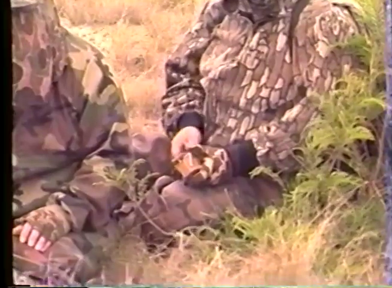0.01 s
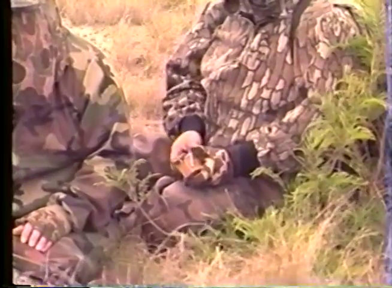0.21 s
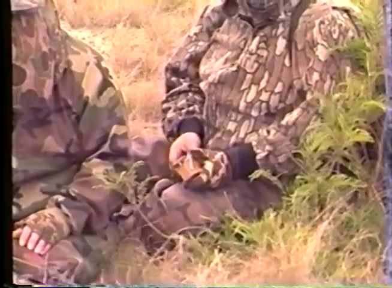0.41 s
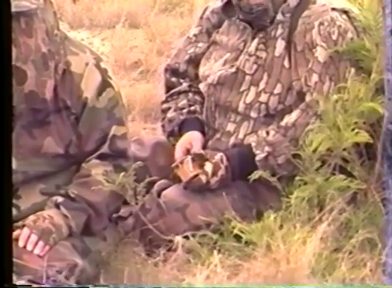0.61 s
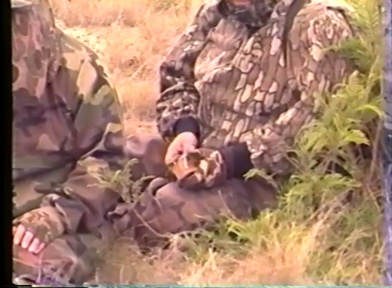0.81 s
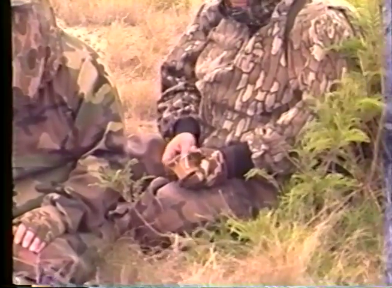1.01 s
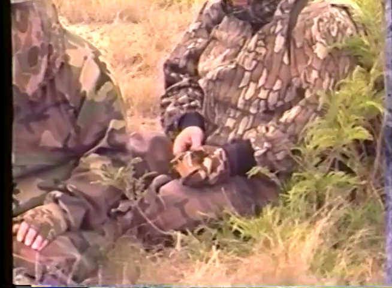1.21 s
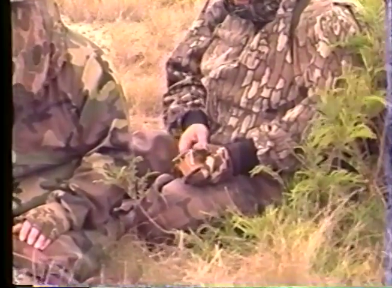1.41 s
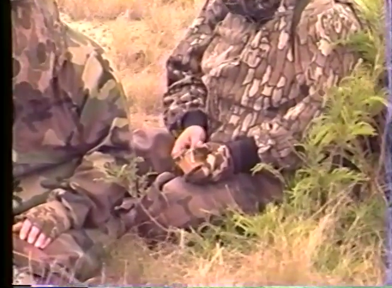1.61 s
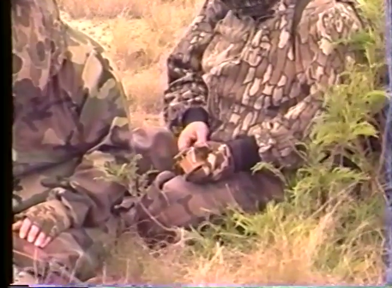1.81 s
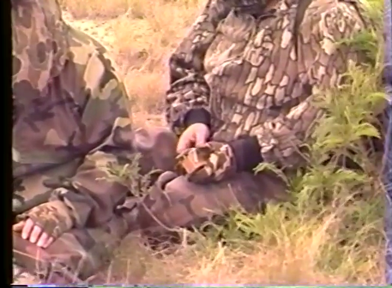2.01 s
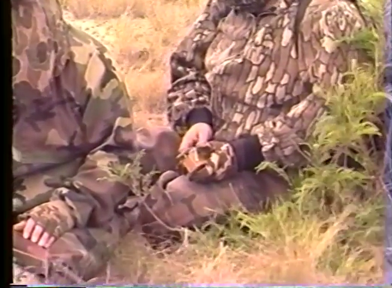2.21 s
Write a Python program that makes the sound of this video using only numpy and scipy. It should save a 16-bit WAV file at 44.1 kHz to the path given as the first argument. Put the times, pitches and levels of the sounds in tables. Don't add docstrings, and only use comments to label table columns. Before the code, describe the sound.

A wooden box call yelps six times, close and dry, outdoors. Faint grass hiss, low hum and wind rumble lead to a soft tap at 0.2 s and a gentle yelp. Stronger scratchy yelps follow at about 0.54, 0.81, 1.08, 1.37 and 1.62 s, each dropping into woody chatter. Light return scrapes and clicks fall between; a dull knock comes near 2 s, then background hiss and wind swell back.

```python
import sys
import numpy as np
from scipy import signal
from scipy.fft import rfft, irfft
from scipy.io import wavfile
from scipy.ndimage import uniform_filter1d

SR = 44100
rng = np.random.default_rng(int(sys.argv[2]) if len(sys.argv) > 2 else 0)


def store_pcm(level_fs):
    pcm = np.round(np.clip(level_fs, -1, 1) * 32767).astype(np.int16)
    wavfile.write(sys.argv[1], SR, np.atleast_2d(pcm).T)


def magnitude_from_level(level_db):
    exponent = np.asarray(level_db, float) / 20
    return 10 ** exponent


N = 101430

# f/Hz, level/dB per Hz
AIR_SPECTRUM = [(150, -2), (250, -11.5), (651, -6.5), (1040, -12), (1280, -16), (2360, -17), (3280, -20.5),
                (5070, -18), (16000, -23.5)]
# t/s, level/dB
BREEZE = [(0, -6), (.15, 2.5), (1.0, -4), (1.9, -2), (2.12, 2), (2.3, -3)]
# f/Hz, width/Hz, level/dB
INSECTS = [(5130, 200, -71), (2166, 90, -71.5)]
# f/Hz, level/dB per Hz
WIND_SPECTRUM = [(8.8, -34), (15, -4), (43, -5.5), (59, -1.5), (124, -10.5), (168, -14.5), (288, -17),
                 (400, -24), (520, -38), (880, -120)]
# t/s, level/dB
GUSTS = [(0, -49.5), (.5, -54), (1.8, -55), (2.02, -43.5), (2.15, -41), (2.22, -48), (2.3, -38.5)]
# f/Hz, level/dB
HUM = [(59.9, -53), (90, -59), (150, -64), (240, -68)]
# f/Hz, level/dB per Hz
SIDE_SPECTRUM = [(12, -24), (20, 10), (571, -36), (940, -32), (1080, -39), (1680, -53), (15000, -76)]
# f/Hz, level/dB
WHINE = (15730, -65.5)
TAP_TIMES = [.18, .515, 1.462, 1.722, 1.981]
# peak level/dB, low-pass f/Hz, lowest mode level/dB
TAPS = [
    (-28, 620, 2),
    (-25.5, 900, 3),
    (-44, 1100, 3),
    (-28.5, 14000, 2),
    (-22.5, 1300, -11.5),
]
# f/Hz, width/Hz, level/dB
TAP_MODES = [(843, 61, 2), (1500, 111, -4), (2160, 830, -16), (3300, 3500, -23), (6070, 1300, -33.5)]
# t/s, level/dB, twice the slip rate f/Hz
EARLY_YELPS = [
    [(0.229, -20.5, 1633), (0.241, -20, 1790), (0.277, -23, 1655), (0.289, -18.5, 1548), (0.305, -21, 1381),
     (0.345, -29.5, 1300), (0.365, -43.5, 1286)],
    [(0.54, -6, 1574), (0.546, -20.5, 1586), (0.56, -21.5, 1709), (0.576, -18.5, 1571), (0.59, -20.5, 1422),
     (0.608, -20, 1305), (0.626, -28, 1270)],
    [(0.81, -22, 1673), (0.818, -21.5, 1707), (0.826, -19, 1607), (0.844, -21.5, 1657),
     (0.854, -17.5, 1569), (0.886, -20.5, 1284), (0.899, -25, 1270)],
]
LATE_YELPS = [
    [(1.086, -13.5, 1589), (1.1, -20.5, 1691), (1.114, -20.5, 1638), (1.128, -18, 1533), (1.148, -20, 1300),
     (1.158, -27.5, 1300)],
    [(1.366, -13.5, 1710), (1.374, -19, 1608), (1.388, -18, 1574), (1.41, -19.5, 1278), (1.42, -28, 1283)],
    [(1.624, -15.5, 1546), (1.634, -19, 1675), (1.648, -18, 1584), (1.678, -20, 1299), (1.69, -26.5, 1265)],
]
# f/Hz, width/Hz, level/dB
BOX_MODES = [(1776, 61, 1), (935.3, 54, -6.5), (1377, 255, 0), (1579.7, 148, 0.5), (2080, 128, -7),
             (2315, 470, -15), (3523, 900, -19), (4070, 320, -10), (4760, 750, -29), (5717, 1060, -24),
             (6317, 450, -20), (7270, 380, -24), (8330, 560, -28.5), (10550, 1500, -36)]
BOX_SIGNS = [-1, 1, 1, -1, 1, -1, -1, 1, 1, 1, -1, -1, -1, 1]
# f/Hz, level/dB
LOWEST_PARTIAL = [(640, -2), (740, -4.5), (785, -12.5), (815, 1), (880, -3.5)]
# t/s, length/s, level/dB, low mode f/Hz, brightness/dB
TAILS = [
    (0.338, 0.021, -43.5, 912, -7),
    (0.621, 0.022, -28.5, 878, -1.5),
    (0.899, 0.023, -28.5, 876, -1.5),
    (1.157, 0.016, -28, 882, -0.5),
    (1.416, 0.025, -27, 914, -3),
    (1.688, 0.025, -26, 868.5, -0.5),
    (1.763, .007, -46.5, 825, -20),
]
# f/Hz, width/Hz, level/dB
TAIL_MODES = [(1330, 270, -9.5), (1620, 300, -19.5), (2098, 50, -7), (2490, 130, -16), (3880, 410, -17),
              (5770, 280, -19.5), (7140, 400, -30.5), (8700, 310, -26.5)]
SCRAPE_TIMES = [.712, 1.01, 1.258, 1.804, 1.983]
# length/s, level/dB, fade/dB
SCRAPES = [
    (0.026, -45, -12),
    (.05, -58.5, -1),
    (0.066, -34, -13),
    (0.044, -38, -11),
    (0.02, -44, -0.5),
]
# f/Hz, width/Hz, level/dB
LID_MODES = [(945, 42, -9.5), (1273, 141, -1.5), (1406, 136, 3), (1508, 124, -3.5), (1880, 200, -19.5),
             (2640, 630, -20), (4040, 330, -16.5), (5590, 130, -11.5), (6180, 120, -13), (7350, 310, -21.5),
             (8420, 490, -18), (9050, 270, -18.5), (11400, 1200, -32.5)]
CHATTER_TIMES = [.81, 1.075, 1.366, 1.623]
# length/s, level/dB, slip rate f/Hz
CHATTERS = [
    (0.009, -26, 790),
    (0.012, -29, 1700),
    (0.0063, -25, 900),
    (0.0054, -25.5, 900),
]
# t/s, length/s, level/dB, start f/Hz, end f/Hz
BIRD = [
    (1.034, .024, -55, 3200, 4400),
]

AIR_DB, SIDE_DB, SIDE_LEAK_DB, PAN_DB = -50, -62.5, -43, 0.64
WOBBLE, WOBBLE_S, SHIMMER, GRIT_DB = 0.007, 0.00093, 0.08, -21
UNSTABLE_HZ, UNSTABLE_SPAN_HZ, UNSTABLE_DB = 790, 70, 9
WANDER_DB, WANDER_S, DULL_PER_DB = 3.5, 0.0046, 0.09
RISE_S, RELEASE_S = 0.0063, 0.0017
LOW_WIDTH_HZ, TAIL_FADE_DB, TAIL_SLIP_S, TAIL_GRIT = 58, -8, 0.00006, 0.1
GRAINS_PER_S, GRAIN_SPREAD_DB, LUMPS_DB = 7000, 3.0, 3.0
CHATTER_JITTER = 0.35
DUCK_FROM_DB, DUCK_SHARE, MOST_DUCK_DB = -50, 0.82, 14.5
RECOVER_DB_PER_S, WIND_DUCK = 170, 0.22
THUMP_DB, TAPE_HISS_DB = -27, -38.5
CEILING = 0.44


def evened(x):
    return x / np.sqrt(np.mean(x ** 2) + 1e-20)


def add(mix, s, sound):
    part = mix[round(s * SR):][:len(sound)]
    part += sound[:len(part)]


def ring(force, modes, signs=None):
    t = np.arange(4096) / SR
    signs = signs or [(-1) ** k for k in range(len(modes))]
    response = 0
    for sign, (hz, width, db) in zip(signs, modes):
        decay = np.exp(-np.pi * width * t)
        response = response + sign * magnitude_from_level(db) * width * decay * np.sin(2 * np.pi * hz * t)
    return signal.oaconvolve(force, response / SR * 2 * np.pi)


def coloured(points):
    hz = np.fft.rfftfreq(N, 1 / SR)
    f, level = np.transpose(points)
    gain = magnitude_from_level(np.interp(np.log(hz + 1), np.log(f + 1), level, left=-100, right=-100))
    return evened(irfft(rfft(rng.standard_normal(N)) * gain, N))


def drift(size, span_s):
    span = max(round(span_s * SR), 2)
    smooth = uniform_filter1d(rng.standard_normal(size), span)
    return evened(uniform_filter1d(smooth, span))


def driven(force, level_db, modes, signs=None):
    heard = ring(force, modes, signs)[:len(force)]
    power = uniform_filter1d(heard ** 2, round(0.0044 * SR), mode="mirror")
    power = np.maximum(power, 0.2 * power.mean())
    return ring(force * magnitude_from_level(level_db) / np.sqrt(power), modes, signs)


def air():
    drones = 0
    for hz, width, db in INSECTS:
        band = [(hz, width, 0)]
        drone = ring(ring(rng.standard_normal(N), band), band)[:N]
        drones = drones + magnitude_from_level(db) * evened(drone)
    breeze_db = np.interp(np.arange(N) / SR, *np.transpose(BREEZE))
    return magnitude_from_level(AIR_DB + breeze_db + drift(N, 0.02)) * coloured(AIR_SPECTRUM) + drones


def wind():
    gust_db = np.interp(np.arange(N) / SR, *np.transpose(GUSTS))
    return coloured(WIND_SPECTRUM) * magnitude_from_level(gust_db - 1.0 + 1.26 * drift(N, 0.031))


def mains_hum():
    t = np.arange(N) / SR
    return sum(magnitude_from_level(db) * np.sin(2 * np.pi * (hz * t + rng.random())) for hz, db in HUM)


def tap(s, peak_db, soft_hz, low_db):
    t = np.arange(200) / SR
    push = np.exp(-2 * np.pi * soft_hz * t)
    push = push - 0.5 * np.roll(push, 110)
    lowest_mode = (*TAP_MODES[0][:2], low_db)
    out = ring(push, [lowest_mode] + TAP_MODES[1:])
    return s, magnitude_from_level(peak_db) * out / abs(out).max()


def yelp(rows):
    s, level, double_hz = np.transpose(rows)
    t = np.arange(s[0], s[-1], 1 / SR)
    size = len(t)
    hz = uniform_filter1d(np.interp(t, s, double_hz), 150) / 2
    shaky = magnitude_from_level(UNSTABLE_DB * np.clip((hz - UNSTABLE_HZ) / UNSTABLE_SPAN_HZ, 0, 1))
    turns = np.cumsum(hz * (1 + shaky * WOBBLE * drift(size, WOBBLE_S))) / SR
    edge = np.clip(np.minimum((t - s[0]) / RISE_S, (s[-1] - t) / RELEASE_S), 0, 1)
    level_db = np.interp(t, s, level) + 20 * np.log10(edge + 1e-4)
    dull_db = DULL_PER_DB * np.clip(level_db + 15.5, -40, 0)

    slips = magnitude_from_level(np.interp(hz, *np.transpose(LOWEST_PARTIAL))) * np.cos(2 * np.pi * turns)
    slips += np.cos(2 * np.pi * 2 * turns)
    for k in range(3, 19):
        partial_db = k * dull_db + WANDER_DB * drift(size, WANDER_S)
        slips += magnitude_from_level(partial_db) * np.cos(2 * np.pi * k * turns)
    burst = 0.64 + np.exp(-(turns % 1) / 0.9)
    grit = evened(burst * rng.standard_normal(size) * magnitude_from_level(3.0 * drift(size, 0.009)))
    force = slips * (1 + SHIMMER * drift(size, 0.0018))
    force += 3 * magnitude_from_level(GRIT_DB + 12 * dull_db) * shaky * grit
    return s[0], driven(force, level_db, BOX_MODES, BOX_SIGNS)


def tail(start, length, level_db, mode_hz, bright_db):
    draw = rng.random((40, 3))
    swings = np.cumsum(1 + (draw[:, 0] * 3).astype(int)) - 1
    at = (swings + 0.5 * draw[:, 1]) / mode_hz
    keep = at < length
    u = np.arange(round(length * SR) + 2) / (length * SR)
    force = TAIL_GRIT * rng.standard_normal(len(u))
    force[(at[keep] * SR).astype(int)] = 0.5 + draw[keep, 2]
    force = signal.lfilter([1], [1, -np.exp(-1 / (TAIL_SLIP_S * SR))], force)
    modes = [(mode_hz, LOW_WIDTH_HZ, -bright_db)] + TAIL_MODES
    return start, driven(force, level_db + TAIL_FADE_DB * u ** 2, modes)


def scrape(start, length, level_db, fade_db):
    t = np.arange(0, length, 1 / SR)
    grains = (rng.random(len(t)) < GRAINS_PER_S / SR) * rng.choice([-1, 1], len(t))
    grains = grains * magnitude_from_level(GRAIN_SPREAD_DB * np.minimum(rng.exponential(1, len(t)), 4))
    shape = magnitude_from_level(LUMPS_DB * drift(len(t), 0.0022) + fade_db * (t / length) ** 2)
    scale = np.sqrt(np.mean(ring(grains, LID_MODES)[:len(t)] ** 2))
    return start, magnitude_from_level(level_db) * ring(grains * shape / scale, LID_MODES)


def chatter(start, length, level_db, rate):
    draw = rng.standard_normal((40, 2))
    at = np.cumsum(np.exp(CHATTER_JITTER * draw[:, 0]) / rate) - 1 / rate
    keep = (at < length) & (at >= 0)
    force = 0.12 * rng.standard_normal(round(length * SR) + 2)
    force[(at[keep] * SR).astype(int)] = magnitude_from_level(1.7 * draw[keep, 1])
    out = ring(signal.lfilter([1], [1, -0.7], force), BOX_MODES, BOX_SIGNS)
    return start, magnitude_from_level(level_db) * out / np.sqrt(np.mean(out[:len(force)] ** 2))


def bird(start, length, level_db, from_hz, to_hz):
    u = np.arange(0, 1, 1 / (length * SR))
    hz = from_hz + (to_hz - from_hz) * u
    return start, magnitude_from_level(level_db) * np.sin(np.pi * u) * np.sin(2 * np.pi * np.cumsum(hz) / SR)


def ducking(power):
    fall = np.arange(N) * RECOVER_DB_PER_S / SR
    held_db = np.maximum.accumulate(10 * np.log10(power) + fall) - fall
    over_db = uniform_filter1d(np.maximum(held_db - DUCK_FROM_DB, 0), 900)
    return np.roll(over_db, 700)


def scene():
    call, far, rumble, hum = np.zeros(N), air(), wind(), mains_hum()
    for s, row in zip(TAP_TIMES, TAPS):
        add(call, *tap(s, *row))
    for rows in EARLY_YELPS + LATE_YELPS:
        add(call, *yelp(rows))
    for row in TAILS:
        add(call, *tail(*row))
    for s, row in zip(CHATTER_TIMES, CHATTERS):
        add(call, *chatter(s, *row))
    for s, row in zip(SCRAPE_TIMES, SCRAPES):
        add(call, *scrape(s, *row))
    for row in BIRD:
        add(far, *bird(*row))

    power = abs(uniform_filter1d(call ** 2, 900)) + 1e-12
    over_db = ducking(power)
    thump = magnitude_from_level(THUMP_DB) * coloured(WIND_SPECTRUM)
    hiss = magnitude_from_level(TAPE_HISS_DB) * coloured(AIR_SPECTRUM)
    mid = call + np.sqrt(power) * (thump + hiss) + hum
    mid += far * magnitude_from_level(-np.minimum(DUCK_SHARE * over_db, MOST_DUCK_DB))
    mid += rumble * magnitude_from_level(-WIND_DUCK * over_db)
    side = magnitude_from_level(SIDE_DB - 0.2 * over_db) * coloured(SIDE_SPECTRUM)
    side += magnitude_from_level(SIDE_LEAK_DB) * np.gradient(call) * 5
    return mid * magnitude_from_level([[PAN_DB / 2], [-PAN_DB / 2]]) + np.array([side, -side])


def top_cut(x):
    return signal.sosfilt(signal.butter(12, 16540, fs=SR, output="sos"), x)


def record(dry):
    t = np.arange(N) / SR
    whine_hz, whine_db = WHINE
    level = magnitude_from_level(whine_db + 2.5 * drift(N, 0.01))
    whine = level * np.sin(2 * np.pi * whine_hz * t + 1.5 * drift(N, 0.008))
    rounded = CEILING * np.tanh(dry / CEILING)
    return top_cut(rounded + whine * magnitude_from_level([[1.2], [-1.2]]))


dry = scene()
out = record(dry)
store_pcm(out)
```